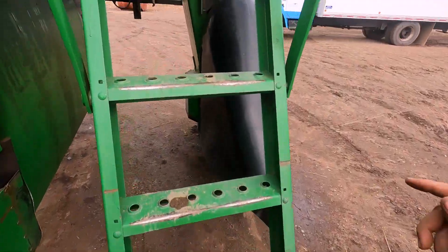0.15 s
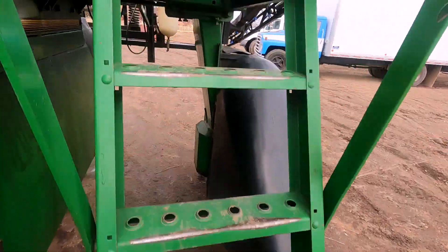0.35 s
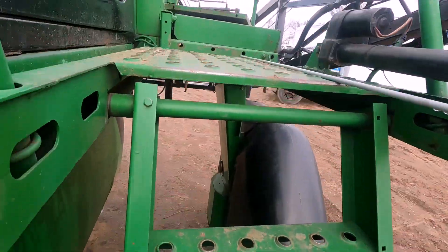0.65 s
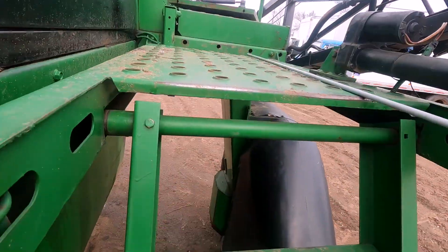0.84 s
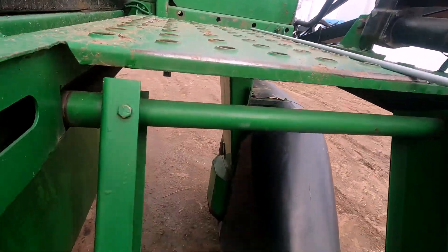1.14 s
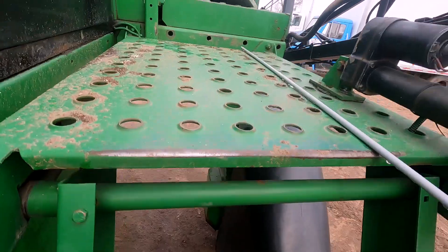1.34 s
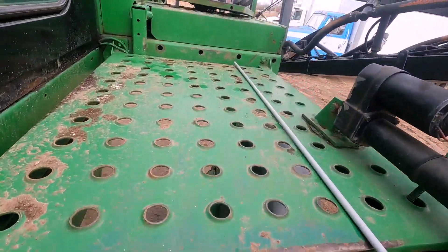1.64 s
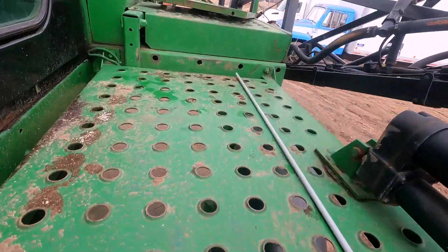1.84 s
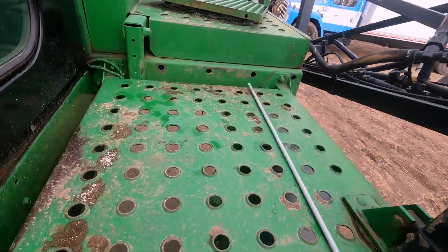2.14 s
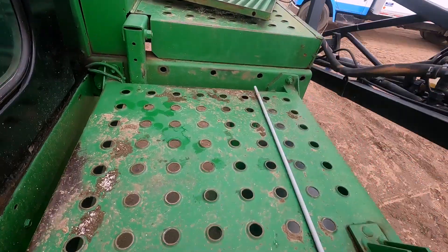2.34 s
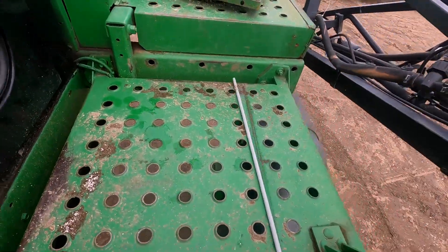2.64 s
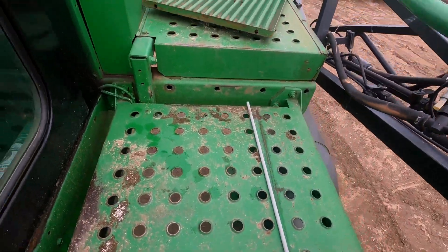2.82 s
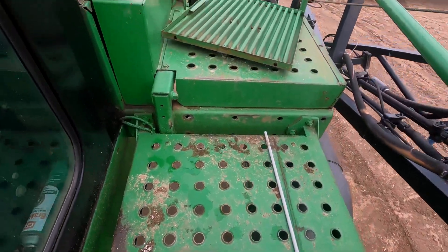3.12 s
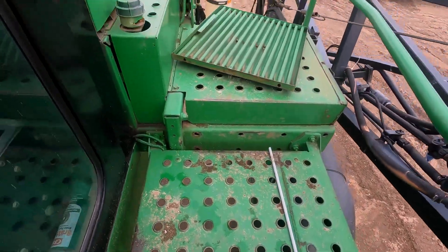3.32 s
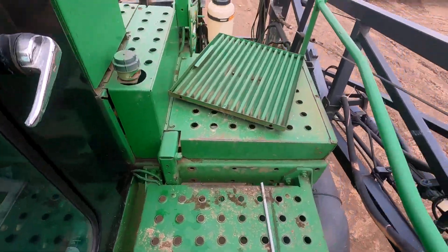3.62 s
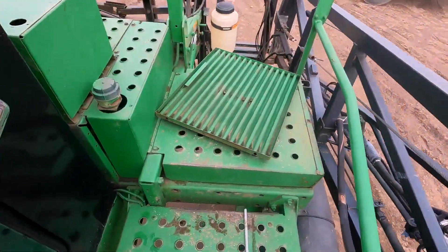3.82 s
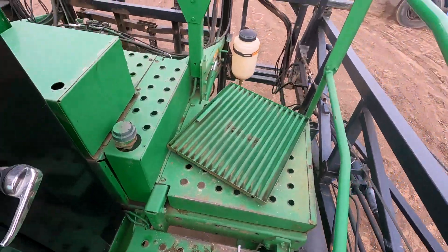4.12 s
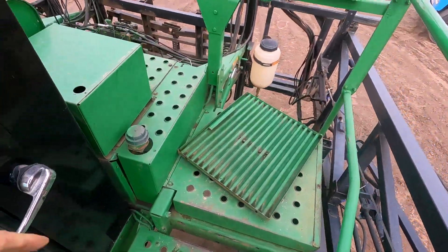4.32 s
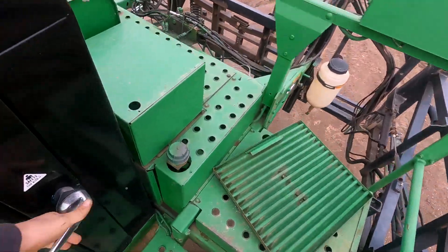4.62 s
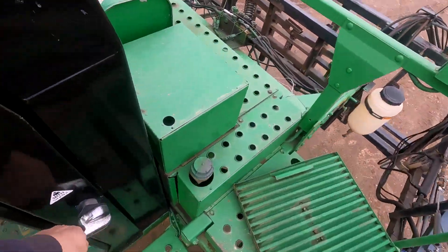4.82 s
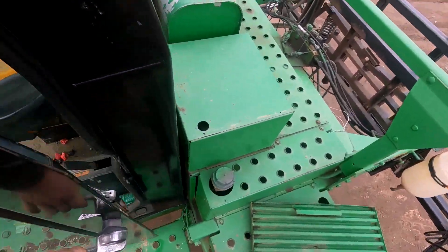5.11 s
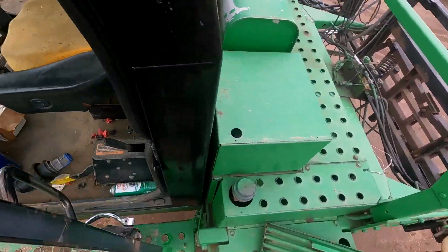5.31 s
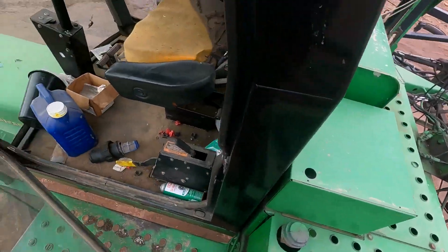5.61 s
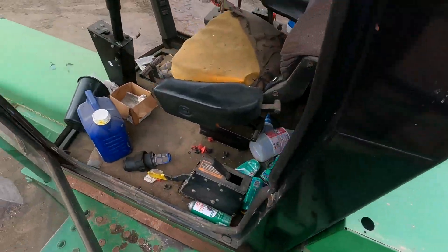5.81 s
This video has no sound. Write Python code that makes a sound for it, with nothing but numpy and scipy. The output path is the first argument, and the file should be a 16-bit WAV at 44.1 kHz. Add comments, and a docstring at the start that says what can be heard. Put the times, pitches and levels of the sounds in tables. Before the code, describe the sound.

Boots clank up a steel ladder and thud across a perforated platform over wind rumble and distant engine hum, then a cab door latch clacks open.

```python
"""Moving air buffets a carried microphone and a distant engine hums over an open yard; then someone climbs
the steel ladder of a parked farm machine, crosses its perforated platform and unlatches the cab door.
Boots thud, loose fittings clink and the latch clacks: damped modes and shaped noise set off by impacts.
Clothes, soles and sliding parts are grainy friction noise; the engine is a set of wavering sines."""
import sys
import numpy as np
from scipy import signal
from scipy.fft import rfft, irfft
from scipy.io import wavfile

SR = 44100
rng = np.random.default_rng(int(sys.argv[2]) if len(sys.argv) > 2 else 0)


def unload_wav(signal):
    """Save mono or channel-first audio to the path in sys.argv[1] as 16-bit WAV at rate SR, clipped to [-1, 1]."""
    wavfile.write(
        sys.argv[1],
        SR,
        np.round(np.clip(np.atleast_2d(signal).T, -1, 1) * 32767).astype(np.int16),
    )


N = 262772
T = np.arange(N) / SR  # time axis of the scene, s
HIT = T[:int(.7 * SR)]  # time axis of one impact, s

# The climber's movements, each stirring the air and rubbing the clothes:
# (middle t/s, half length/s, air level/dB, rustle level/dB)
MOVES = [(0.04, .04, -30, -80), (0.27, 0.058, -44, -75), (1.072, 0.054, -31, -85), (2.202, 0.3, -52, -68),
         (2.54, 0.035, -33, -68), (3.05, 0.088, -25, -54), (3.19, 0.05, -27, -61.5),
         (3.7, 0.56, -38, -59.5), (4.126, 0.074, -21.5, -68), (4.58, 0.076, -34, -61.5),
         (4.972, 0.14, -40, -51), (5.095, 0.062, -22.5, -73), (5.33, 0.085, -19, -51),
         (5.468, 0.069, -22.5, -51), (5.586, 0.044, -23, -62), (5.706, 0.05, -24.5, -56.5),
         (5.87, 0.3, -35, -57.5)]
CATCH_DB = 1.2  # unevenness of sliding friction


def undb(db):
    """Level to amplitude: 20 dB is a factor of ten."""
    return 10 ** (np.asarray(db) / 20)


def unit(x):
    """Normalise the mean power: scale to rms 1."""
    return x / np.sqrt(np.mean(x ** 2))


def curve(rows):
    """Amplitude envelope interpolated linearly in level from (t/s, level/dB) rows."""
    return undb(np.interp(T, *np.transpose(rows)))


def colour(x, points):
    """Linear filtering: weight the spectrum by (f/Hz, level/dB) points on a log-frequency axis, at rms 1."""
    hz, db = np.transpose(points)
    f = np.maximum(np.fft.rfftfreq(len(x), 1 / SR), 1e-3)
    gain = undb(np.interp(np.log(f), np.log(hz), db))
    return unit(irfft(rfft(x) * gain, len(x)))


def grains(t, spread_db):
    """Contact noise: dense tiny contacts of uneven size; zero spread gives plain white noise."""
    size = np.minimum(rng.exponential(size=len(t)), np.pi)
    return unit(rng.standard_normal(len(t)) * undb(spread_db * size))


def walk(rate):
    """Band-limited random fluctuation of rms 1, drawn about `rate` times a second."""
    count = int(T[-1] * rate) + 2
    return unit(signal.resample(rng.standard_normal(count), N))


def jitter(values):
    """Random fluctuation along one impact, linear between evenly spaced values."""
    return np.interp(HIT, np.linspace(0, HIT[-1], num=len(values)), values)


def swell(rise_s, decay_s):
    """Contact envelope: linear loading, then exponential loss of energy."""
    rise = np.minimum(HIT / max(rise_s, 1e-4), 1)
    return rise * np.exp(-np.maximum(HIT - rise_s, 0) / decay_s)


def decay(t60):
    """Viscous damping: exponential decay by 60 dB in t60 seconds."""
    return np.exp(-np.log(1000) * HIT / t60)


def mode(hz, t60, sag=0):
    """Damped normal mode; sag is the share by which it starts sharp before it settles."""
    turns = np.cumsum(hz * (1 + sag * np.exp(-HIT / 0.017))) / SR
    return np.sqrt(2) * np.sin(2 * np.pi * turns) * decay(t60)


def modes(rows, gain_db=0):
    """Modal superposition of (f/Hz, t60/s, level/dB) rows."""
    return sum(undb(gain_db + db) * mode(hz, t60) for hz, t60, db in rows)


def crowd(count):
    """High modal density: many modes of random phase, spread over the range of a steel part."""
    hz = np.geomspace(80, 16000, count) * (1 + 5 / count * rng.uniform(-.5, .5, count))
    spectrum = np.zeros(len(HIT) // 2 + 1, complex)
    bins = (hz * len(HIT) / SR).astype(int)
    spectrum[bins] = np.sqrt(hz) * np.exp(2j * np.pi * rng.random(count))
    return irfft(spectrum, len(HIT))


def panel(hz, t60, crowd_db):
    """Plate vibration: one damped main mode, sagging as the sheet unbends, among its neighbours."""
    shape = [(hz / 4, -40), (hz / 2.2, -8), (hz, 0), (hz * 1.46, -7), (hz * 4, -35), (hz * 20, -80)]
    neighbours = colour(grains(HIT, 0), shape)
    return mode(hz, t60, sag=0.11) + undb(crowd_db) * neighbours * decay(t60)


def stirred(rest_db, moves):
    """Incoherent power sum of a steady level and (middle t/s, half length/s, level/dB) movements."""
    power = sum(undb(db) ** 2 * np.exp(-((T - s) / half_s) ** 2) for s, half_s, db in moves)
    return np.sqrt(undb(rest_db) ** 2 + power)


def bump(middle_s, half_s):
    """Gaussian envelope of one gradual onset and release."""
    return np.exp(-.5 * ((T - middle_s) / half_s) ** 2)


def add(out, s, sound):
    """Linear superposition: mix a sound in at time s."""
    start = int(s * SR)
    out[start:start + len(sound)] += sound[:N - start]


def near_walls(x, share=0.061, drift=0.065):
    """Early reflection: two delayed copies from steel sides, whose paths drift as the microphone moves."""
    index = np.arange(N)
    echoes = 0
    for lag_s in (.0023, .0071):
        lag = lag_s * SR * (1 + drift * walk(1))
        echoes = echoes + np.interp(index - lag, index, x)
    return (x + share * echoes) / np.sqrt(1 + 2 * share ** 2)


def yard():
    """Diffuse ambient field: shaped open-air noise whose level follows the turning microphone."""
    # level reaching the microphone: (t/s, level/dB)
    yard_level = [(0.0, -43.5), (0.8, -41), (1.3, -45.5), (2.04, -41), (2.9, -43.5), (3.75, -42),
                  (4.5, -42), (5.5, -38.5), (5.96, -41)]
    # ambient spectrum: (f/Hz, level/dB)
    yard_spectrum = [(70, 9), (120, 2.5), (200, 2.5), (250, 1.5), (350, 0), (480, -2.5), (800, -2.5),
                     (1200, -5), (1900, -9), (3000, -19.5), (5000, -28), (12000, -36.5)]
    return colour(grains(T, 0), yard_spectrum) * curve(yard_level) * undb(0.42 * walk(16))


def engine(waver=0.0073, flutter_db=2.5):
    """Tonal radiation: sines of a far engine, each wavering in frequency and level."""
    # tones: (f/Hz, level/dB), the first two then scaled by deep_gain
    hum_tones = [(144, -60.5), (183, -53), (295.5, -53.5), (366, -60), (517, -64), (767, -80)]
    # gain of the two deepest tones: (t/s, level/dB)
    deep_gain = [(0, -2.5), (1.4, -4.5), (2.3, 3), (3.2, 0), (3.8, 4.5), (4.4, -2.5), (5.9, 6.5)]
    tones = []
    for hz, db in hum_tones:
        level = undb(db + flutter_db * walk(8))
        turns = hz * np.cumsum(1 + waver * walk(12)) / SR
        tones.append(level * np.sqrt(2) * np.sin(2 * np.pi * turns))
    return sum(tones[:2]) * curve(deep_gain) + sum(tones[2:])


def whine(hz=10200, early_db=-82, late_db=-69):
    """Narrow-band noise: a faint high whine that wavers and slowly grows."""
    shape = [(hz * .9, -60), (hz * .98, -12), (hz, 0), (hz * 1.02, -12), (hz * 1.1, -60)]
    level_db = np.linspace(early_db, late_db, N) + 2 * walk(19)
    return colour(grains(T, 0), shape) * undb(level_db)


def wind(sway_db=-14.0, breeze_db=-40, gust_db=2):
    """Turbulent pressure on the microphone: eddies rise with each movement over slow swings as it is carried."""
    # eddy spectrum: (f/Hz, level/dB)
    eddy_spectrum = [(12, -47), (22, -1), (32, -5.5), (42, -24), (60, -22.5), (90, -30), (130, -48.5),
                     (300, -47), (1000, -99)]
    # spectrum of the slow swings: (f/Hz, level/dB)
    sway_spectrum = [(1, 0), (3, -9), (5.5, 5.5), (10, -6), (15, -9), (22, -42), (40, -147), (100, -100)]
    flow = stirred(breeze_db, [(s, half_s, air_db) for s, half_s, air_db, rustle_db in MOVES])
    eddies = colour(grains(T, 0), eddy_spectrum) * flow * undb(gust_db * walk(17))
    # soft limiting flattens the largest swings
    sway = unit(np.tanh(colour(grains(T, 0), sway_spectrum) / 2))
    ease = signal.windows.tukey(N, .03)  # brief fade at both ends
    return (eddies + undb(sway_db) * sway) * ease


def rubbing(rest_db=-63, grain_db=2.5):
    """Dry friction: cloth slides in fine, uneven catches, louder whenever the body moves."""
    # cloth spectrum: (f/Hz, level/dB)
    cloth_spectrum = [(800, -30), (2000, 3), (3300, 3), (4500, -0.5), (5600, -2), (7500, -2.5),
                      (9300, -8.5), (11000, -13), (15000, -19)]
    effort = stirred(rest_db, [(s, half_s, rustle_db) for s, half_s, air_db, rustle_db in MOVES])
    return colour(grains(T, grain_db), cloth_spectrum) * effort * undb(CATCH_DB * walk(90))


def slides():
    """Sliding friction: tiny slips, now catching and now running, excite one broad resonance."""
    # soles, sleeves, fittings and the door bolt sliding on steel:
    # (middle t/s, level/dB, half length/s, centre f/Hz, width/octaves)
    slide_events = [(0.033, -42, 0.17, 377, 0.66), (0.336, -40.5, 0.044, 453, 1.7),
                    (0.737, -45, 0.24, 1050, 0.93), (1.248, -41.5, 0.042, 396, 0.22),
                    (1.88, -45, 0.008, 1490, 0.57), (1.897, -51.5, .017, 2780, .13),
                    (2.75, -52, 0.018, 2840, 0.73), (2.876, -51.5, 0.036, 2800, 1.07),
                    (3.017, -46, 0.014, 2250, 0.41), (3.024, -60, 0.068, 4520, 0.11),
                    (3.675, -50, 0.19, 1170, 0.78), (2.511, -50, .012, 5000, 1.1),
                    (3.51, -58.5, 0.045, 5790, 0.05), (4.133, -45.5, 0.048, 2300, 1.2),
                    (4.53, -47.5, 0.16, 530, 0.23), (4.772, -40, 0.021, 380, 1.1),
                    (4.891, -37, 0.0045, 14900, .04), (4.957, -50, 0.075, 2090, 0.32),
                    (4.973, -57, 0.036, 6740, 0.8), (5.06, -48, 0.056, 810, 0.66),
                    (4.79, -55, 0.038, 2180, .4)]
    out = np.zeros(N)
    f = np.maximum(np.fft.rfftfreq(len(HIT), 1 / SR), 1)
    for s, db, half_s, hz, octaves in slide_events:
        body = 1 / (1 + (np.log2(f / hz) / octaves) ** 2) ** 2
        slips = unit(irfft(rfft(grains(HIT, 3.8)) * body, len(HIT)))
        out += undb(db) * np.resize(slips, N) * bump(s, half_s)
    return out * undb(CATCH_DB * walk(45))


def twist(middle_s=3.955, half_s=.028, level_db=-38.7, slips_per_s=1200):
    """Stick-slip friction: each slip of a turning sole impulsively excites resonances of the deck."""
    # deck resonances: (f/Hz, bandwidth/Hz, level/dB)
    rasp_resonances = [(430, 45, -2.5), (1580, 220, 1), (2100, 250, -2.5), (3390, 290, -0.5),
                       (4300, 190, -7.5)]
    slips = (rng.random(N) < slips_per_s / SR) * rng.uniform(0.6, 1, N)
    rasp = 0
    for hz, width, db in rasp_resonances:
        b, a = signal.iirpeak(hz, hz / width, fs=SR)
        rasp = rasp + undb(db) * unit(signal.lfilter(b, a, slips * rng.choice([-1, 1], N)))
    return undb(level_db) * unit(rasp) * bump(middle_s, half_s)


def pings():
    """Free vibration: a small loose washer rings thinly when the deck is jolted."""
    # jolts: (t/s, level/dB)
    jolts = [(1.887, -55), (2.565, -50), (4.093, -48)]
    # washer modes: (f/Hz, t60/s, level/dB)
    washer_modes = [(8200, .1, 0), (13700, .16, -2), (14150, .14, -12)]
    out = np.zeros(N)
    for s, db in jolts:
        add(out, s, undb(db) * modes(washer_modes))
    return out


def plate(snap_s=4.0945, level_db=-33, rise_s=0.00085):
    """Impact excitation: a loose deck plate snaps down under the weight, its short modes a hollow click."""
    # plate modes: (f/Hz, t60/s, level/dB)
    plate_modes = [(834, 0.073, -1), (1330, .06, -2.5), (1830, 0.056, -5), (2360, 0.043, -2),
                   (3130, .04, -6), (3910, 0.031, -0.5), (4690, 0.038, -6.5), (5570, 0.11, -14)]
    out = np.zeros(N)
    ring = sum(rng.choice([-1, 1]) * undb(db) * mode(hz, t60) for hz, t60, db in plate_modes)
    add(out, snap_s, undb(level_db) * ring * np.minimum(HIT / rise_s, 1))
    return out


def clinks(tail_db=-6, tail_s=0.02, frame_s=0.024, frame_modes_db=-5):
    """Repeated impact: loose steel chatters, shakes the frame and rings on in its own high modes."""
    # steel on steel: (t/s, level/dB, chatter time/s, bright ring level before halving/dB,
    # frame clank level/dB, place struck 0-1, pitch waver as a share)
    strikes = [(1.185, -21, 0.014, 2, -16, 0.1, 0.0035), (2.517, -23, 0.014, 8.5, -10, 0.92, .0015),
               (2.552, -25.5, 0.011, 1, 1.5, 0.96, 0.0017), (1.708, -53.5, 0.0034, -11, -1.5, 0.9, .003),
               (2.178, -59.5, 0.0063, 8, 2, 0.8, .003), (2.262, -60.5, 0.043, 12, -4, 0.6, 0.0028)]
    # modes of the fitting: (f/Hz, t60/s, level at place 0/dB, level at place 1/dB)
    fitting_modes = [(1416, .25, -25, -18), (3433, .17, -24, -12), (5720, .2, -9, -11),
                     (5780, .4, -23, -14), (5815, .37, -12, -27), (5884, .33, -6, -27),
                     (5970, .18, -18, -10), (6008, .25, -14, -14), (6331, .12, -18, 3),
                     (6484, .16, -18, -13), (6620, .12, -6, -13), (6810, .12, -3, -16),
                     (7080, .13, -16, -11), (7587, .15, -3, -10), (7634, .15, -6, -11),
                     (8220, .18, -12, -15), (13630, .15, -18, -21)]
    # spectrum of the contact: (f/Hz, level/dB)
    contact_spectrum = [(1500, -30), (2800, -13), (3700, -7), (4700, -14), (5500, -7), (6100, -6.5),
                        (7600, -5), (8800, -14.5), (11000, -22), (15500, -38)]
    # spectrum of the frame behind it: (f/Hz, level/dB)
    frame_spectrum = [(200, 11), (400, 7), (800, 6.5), (1400, 18), (1850, 19.5), (2400, 21.5), (3400, 7),
                      (4400, -30), (9500, 5.5), (15500, -20)]
    # modes of the frame: (f/Hz, t60/s, level/dB)
    frame_modes = [(1842, 0.15, -1.5), (2260, 0.11, -9), (2454, 0.069, 2), (3290, 0.12, -1.5),
                   (3750, 0.083, -23), (3880, 0.13, -10)]
    rock_db, settle_s = 3.5, .15  # level waver of each mode; time scale of its sinking pitch
    out = np.zeros(N)
    for s, db, chatter_s, ring_db, frame_db, place, waver in strikes:
        chatter = colour(grains(HIT, 0.67), contact_spectrum)
        chatter = chatter / (1 + (HIT / chatter_s) ** 2) * np.exp(-HIT / 0.14)
        # colouring twice: only the strongest part of the contact's spectrum lingers
        shimmer = colour(colour(crowd(count=400), contact_spectrum), contact_spectrum)
        shimmer = shimmer * swell(0.0012, tail_s)
        ring = 0
        for hz, t60, first_db, second_db in fitting_modes:
            # the part rocks in its seat, so each mode wavers in level and pitch, and sinks as it settles
            rock = jitter(rng.standard_normal(120))
            bend = jitter(rng.standard_normal(70)) - (HIT / settle_s) ** 2
            gain = undb(first_db + place * (second_db - first_db) + rock_db * rock)
            ring = ring + rng.choice([-1, 1]) * gain * mode(hz * (1 + waver * bend), t60)
        ring = ring * np.minimum(np.pi * HIT / chatter_s, 1) / 2  # the chatter pumps the ring up
        frame = colour(crowd(count=260), frame_spectrum) * swell(0.00045, frame_s)
        frame = frame + modes(frame_modes, frame_modes_db)
        clink = chatter + undb(tail_db) * shimmer + undb(ring_db) * ring + undb(frame_db) * frame
        add(out, s, undb(db) * clink)
    return out


def door(push_s=0.0048, ring_db=-5):
    """Forced then free vibration: each bolt knock booms a patch of panel and the whole door rings on."""
    # the bolt knocking the door panel: (t/s, level/dB, panel f/Hz, t60/s)
    knocks = [(4.890, -27, 1020, .09), (4.891, -33.5, 740, .08), (4.903, -31.5, 307, 0.082),
              (4.907, -27.5, 789, .15), (4.907, -30, 1440, .09), (5.022, -34, 1070, .06),
              (5.028, -38, 700, .09), (5.368, -26.5, 1050, .08), (5.375, -19.5, 625, .085),
              (5.384, -28.5, 530, .11), (5.408, -36, 720, .15)]
    # modes of the whole door: (f/Hz, t60/s, level/dB)
    door_modes = [(748, 0.32, -17.5), (1043, 0.09, -9), (1590, 0.058, -11)]
    out = np.zeros(N)
    for s, db, hz, t60 in knocks:
        push = np.minimum(HIT / push_s, 1)
        body = panel(hz, t60, crowd_db=-4) + modes(door_modes, ring_db)
        add(out, s, undb(db) * push * body)
    return out


def latch(steel_db=-9, steel_s=0.011, judder_db=3, part_db=-9, part_s=0.0076):
    """Stick-slip and impact: the bolt judders and snaps; each jolt rings another part of the lock."""
    # jolts of handle and latch:
    # (t/s, level/dB, rise/s, decay/s, brightness/(dB per octave), struck part f/Hz)
    latch_jolts = [(4.874, -35, .0005, .003, 2, 8300), (4.8845, -28, 0.00045, 0.0081, 2.5, 9050),
                   (4.891, -30.5, .0005, .006, 0, 7000), (4.9074, -24, 0.00033, 0.0031, -3, 3590),
                   (4.911, -27, 0.00026, 0.004, -2.5, 5180), (5.023, -43, .001, .005, -4, 4500),
                   (5.289, -42, .0003, 0.0015, 5, 8500), (5.305, -35, .0014, 0.016, -3.5, 3400),
                   (5.340, -32, .008, 0.016, -0.5, 4180), (5.363, -26.5, .002, .007, 1, 8200),
                   (5.369, -22.5, .001, 0.0093, -3, 3620), (5.376, -23, 0.0012, 0.011, 3, 9700),
                   (5.402, -30, .0012, 0.0074, -1.5, 6800), (5.416, -35, 0.0024, 0.01, 1.5, 7400),
                   (5.481, -43, .002, 0.012, 5, 9400), (5.495, -46, .002, .008, 2, 8000),
                   (5.929, -40, 0.0025, 0.028, -1, 5500)]
    # spectrum of the latch before tilting: (f/Hz, level/dB)
    latch_spectrum = [(300, -4.5), (1000, 1.5), (1900, 3), (3200, -0.5), (6000, -1.5), (9500, -4.5),
                      (12000, -12), (14000, -11), (15000, -19), (16000, -25)]
    out = np.zeros(N)
    for s, db, rise_s, decay_s, tilt, part_hz in latch_jolts:
        spectrum = [(hz, band_db + tilt * np.log2(hz)) for hz, band_db in latch_spectrum]
        # sticking and slipping every millisecond or so
        judder = unit(undb(judder_db * jitter(rng.uniform(-2, 2, 600))))
        scrape = colour(grains(HIT, 0.76), spectrum) * judder * swell(rise_s, decay_s)
        steel = colour(crowd(count=90), spectrum) * swell(rise_s, steel_s)
        part = colour(grains(HIT, 0), [(part_hz * .85, -50), (part_hz, 0), (part_hz * 1.15, -50)])
        part = part * swell(rise_s, part_s)
        add(out, s, undb(db) * (scrape + undb(steel_db) * steel + undb(part_db) * part))
    return out


def boots(deck_s=0.058, push_cycles=1.2):
    """Soft impact: each rubber sole booms its panel and shakes the deck; grit crushes in bursts of noise."""
    # boots loading the sheet steel: (t/s, level/dB, panel f/Hz, t60/s, deck level/dB)
    footfalls = [(1.137, -42, 580, 0.06, 2), (1.215, -40.5, 380, 0.13, 0.5), (1.869, -35.5, 487, 0.087, 1),
                 (1.878, -32, 585.5, .18, -9), (2.518, -27, 371, 0.07, -7), (2.664, -39, 564, .07, -5.5),
                 (2.674, -28, 200, 0.18, -14.5), (3.143, -32.5, 240, 0.094, -11),
                 (3.148, -38, 700, 0.12, -8), (3.862, -19, 387, 0.05, -17.5), (3.868, -30, 519, 0.12, -22),
                 (3.885, -36, 393.5, 0.31, -0.5), (4.099, -34, 630, 0.05, -6), (4.102, -27, 160, 0.11, -24),
                 (4.131, -30, 145, .12, -23), (4.757, -37.5, 370, .14, -4), (4.783, -30.5, 182, 0.17, -16)]
    # spectrum of the deck: (f/Hz, level/dB)
    deck_spectrum = [(90, 5), (200, -8.5), (350, 6.5), (700, 2), (1100, -3), (2000, -13.5), (4000, -28),
                     (9000, -27.5), (16000, -44)]
    # grit crushed under a sole, and the gritty crack as the loose plate snaps at 4.094 s: (t/s, level/dB,
    # rise/s, decay/s)
    grit_events = [(.315, -48, .01, .02), (.473, -49, .002, .008), (1.869, -45, .002, .02),
                   (1.886, -42, .002, .012), (1.964, -49, .001, .005), (2.005, -57, .015, .025),
                   (2.165, -55, .015, .025), (2.262, -55, .012, .025), (3.865, -46, .002, .02),
                   (4.112, -51, .005, .04), (4.596, -46, .001, .007), (4.094, -31, .001, .004)]
    # spectrum of the grit: (f/Hz, level/dB)
    grit_spectrum = [(500, -22), (1200, 8.5), (2600, 4.5), (4000, 0.5), (6000, -1), (9000, -4), (12500, -8),
                     (13700, -8), (15500, -24)]
    out = np.zeros(N)
    for s, db, hz, t60, deck_db in footfalls:
        deck = colour(crowd(count=60), deck_spectrum) * swell(0.00073, deck_s)
        # a softer footfall wakes a deeper mode: the push lasts a set number of its cycles
        push = np.minimum(HIT * hz / push_cycles, 1)
        add(out, s, undb(db) * push * (panel(hz, t60, crowd_db=-4.0) + undb(deck_db) * deck))
    for s, db, rise_s, decay_s in grit_events:
        add(out, s, undb(db) * colour(grains(HIT, 4.0), grit_spectrum) * swell(rise_s, decay_s))
    return out


def scene():
    """Superposition of all sources at the one microphone."""
    background = engine() + whine() + wind()
    reflected = near_walls(yard() + rubbing() + slides())
    steel = pings() + plate() + clinks() + door() + latch()
    return (background + reflected + twist() + steel + boots())[None]


def record(dry, top_hz=15800):
    """Band limitation: a steep elliptic low-pass removes the top of the spectrum."""
    low_pass = signal.ellip(10, .1, 90, top_hz, fs=SR, output="sos")  # order, ripple/dB, stop band/dB
    return signal.sosfilt(low_pass, dry)


dry = scene()
out = record(dry)
unload_wav(out)
```